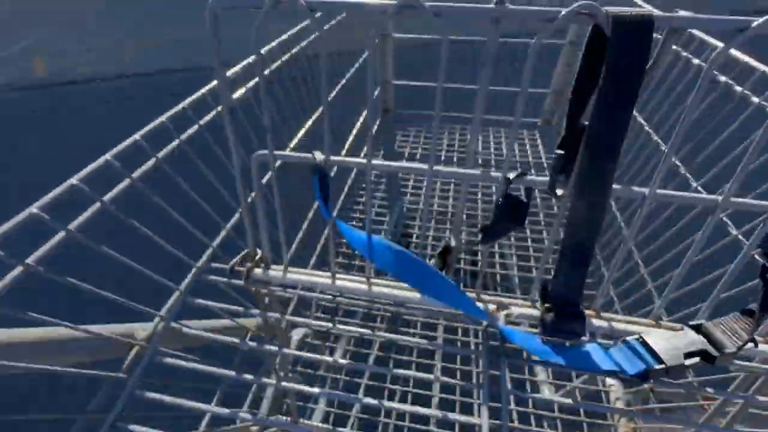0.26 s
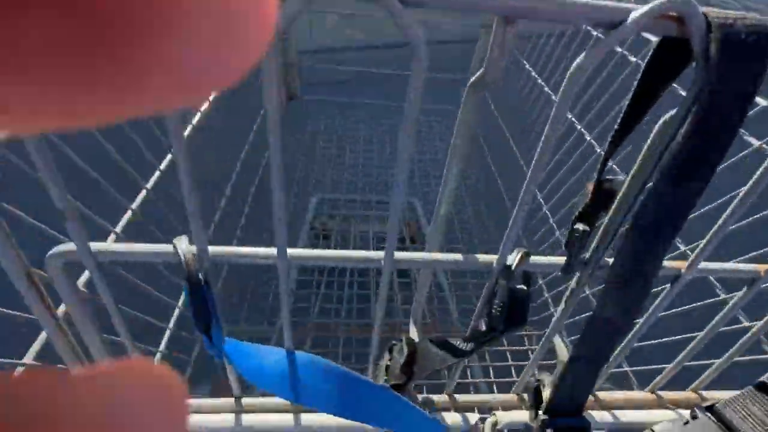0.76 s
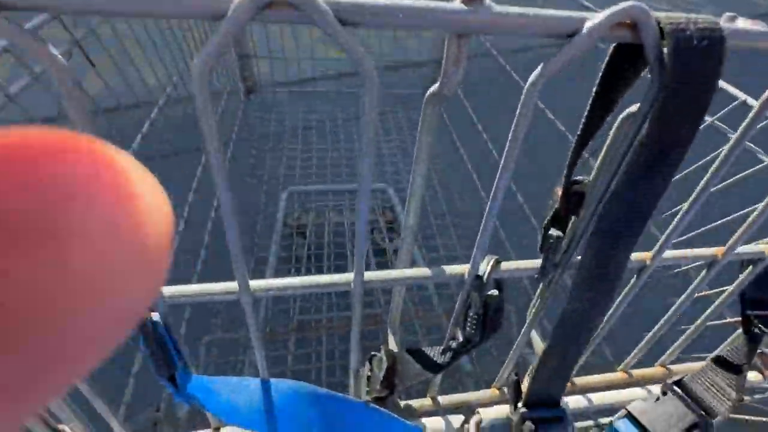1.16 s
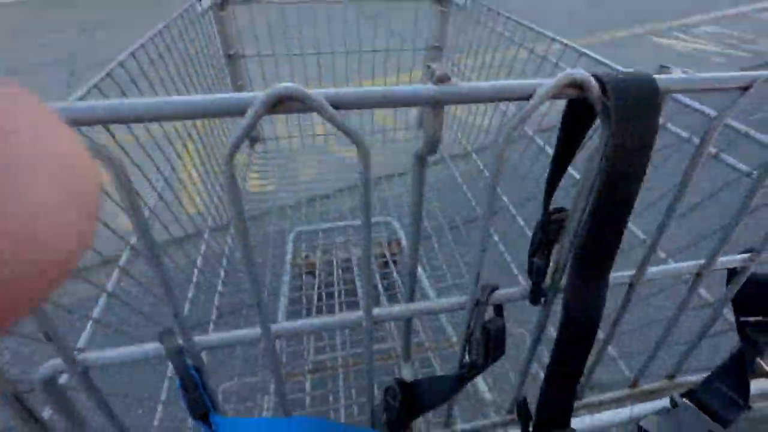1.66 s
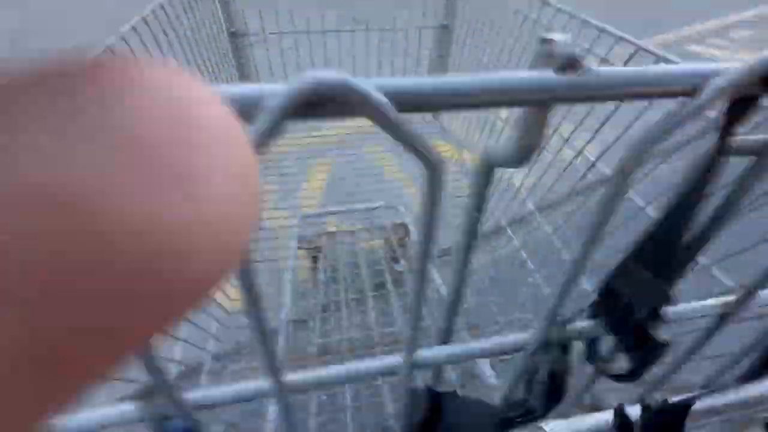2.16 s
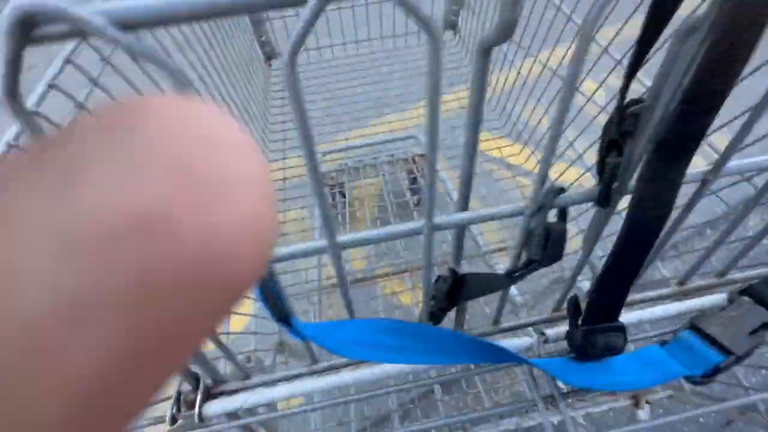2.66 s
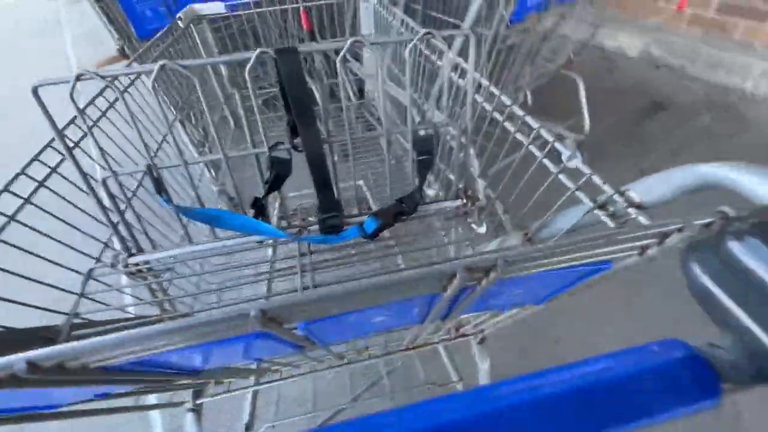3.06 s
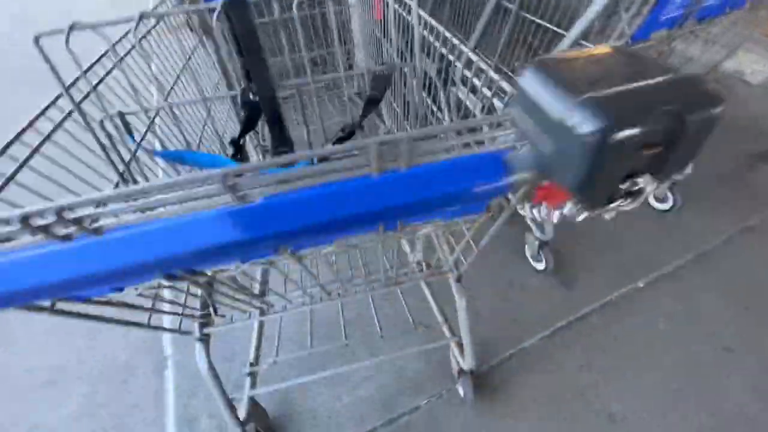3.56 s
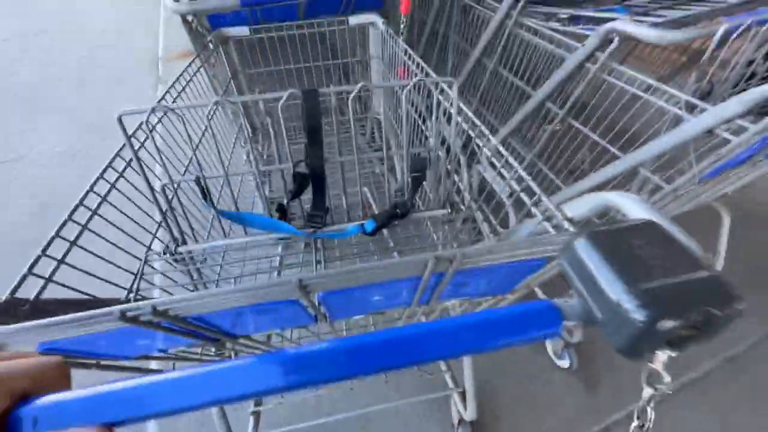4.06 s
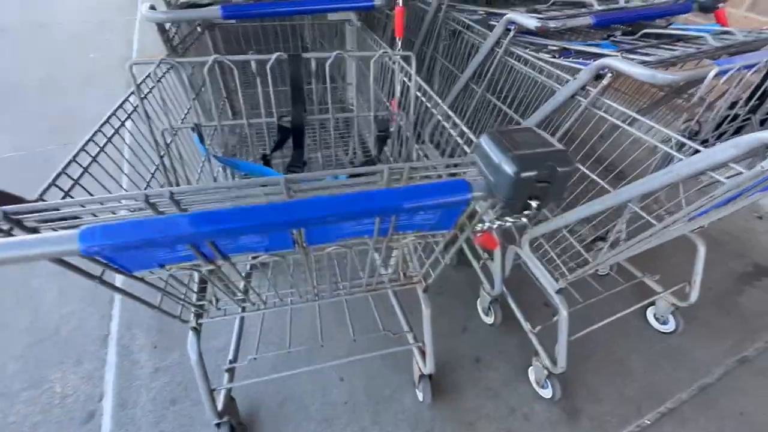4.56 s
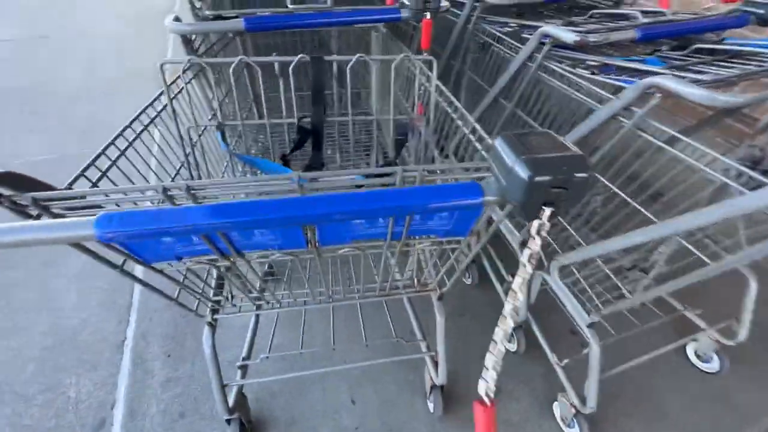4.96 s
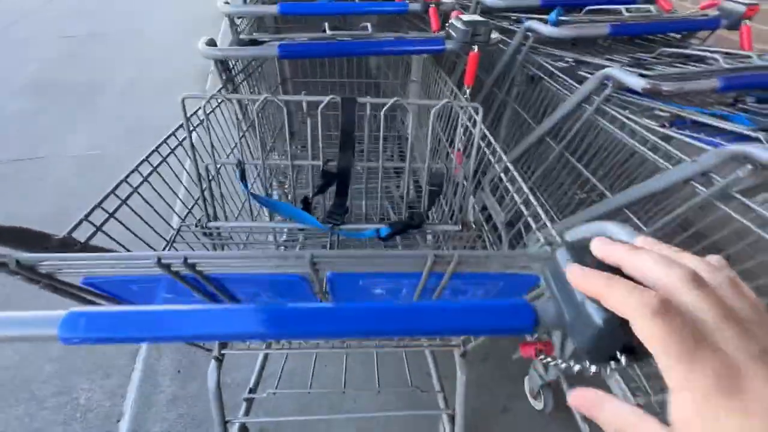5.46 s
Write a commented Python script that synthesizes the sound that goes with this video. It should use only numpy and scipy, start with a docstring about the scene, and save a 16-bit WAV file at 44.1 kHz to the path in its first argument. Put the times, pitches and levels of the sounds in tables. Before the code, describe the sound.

Loud jangling of a wire cart on rough pavement, a sudden near-hush, ringing metal crashes against other carts, then small chain clinks.

```python
"""Over the low noise and hollow drone of a car park, a steel wire shopping cart rattles across rough asphalt.
Wheels rumble, frame tubes clatter and basket wires buzz: noise and random contacts coloured by resonances.
From 2.75 s it glides quietly on smooth concrete, wires shivering and chain links ticking.
From 3.47 s it is shoved into a row of nested carts, and frames scrape and clash in ringing steel modes.
Near 5.2 s a link of the lock chain squeaks as a gliding sine, then the lock clinks in dense partials."""
import sys
import numpy as np
from scipy import signal
from scipy.fft import rfft, irfft, next_fast_len
from scipy.io import wavfile
from scipy.ndimage import uniform_filter1d

SR = 44100
rng = np.random.default_rng(int(sys.argv[2]) if len(sys.argv) > 2 else 0)


def waveform_to_disk(signal):
    """Save audio, clipped to [-1, 1], as 16-bit WAV at the path in sys.argv[1]."""
    frames = np.transpose(np.atleast_2d(signal))
    scaled = np.clip(frames, -1, 1) * 32767
    samples = np.round(scaled).astype(np.int16)
    wavfile.write(sys.argv[1], SR, samples)


N = 251370
TIME = np.arange(N) / SR
SIZE = next_fast_len(N + 8192)  # zero-padded transform length
FREQ = np.fft.rfftfreq(SIZE, 1 / SR)

CONCRETE_S = 2.754  # the wheels reach smooth concrete

# resonances of the wire basket: (frequency [Hz], width [Hz], lift [dB])
BASKET = [(970, 200, 1), (1870, 91, 0.5), (2745, 170, 1.5), (4480, 260, 2), (6110, 480, 2),
          (7186, 180, 6.5), (8960, 350, 1.5)]
# resonances of the nested row: (frequency [Hz], width [Hz], lift [dB])
ROW = [(1130, 280, -0.5), (1900, 200, -1.5), (2230, 120, 2), (2740, 120, -0.5), (4460, 300, 1.5),
       (5750, 120, 3.5), (9750, 250, 0)]
# shoves along the row: (start [s], length [s], frame clatter level [dB], wire buzz level [dB])
SHOVES = [(3.467, 0.21, -27.5, -20.5), (3.56, 0.16, -27, -43.5), (3.717, 0.15, -24, -20),
          (4.11, .02, -43, -30.5), (4.134, 0.085, -31, -29.5), (4.211, 0.058, -23.5, -19.5),
          (4.385, 0.2, -31.5, -28.5), (4.732, 0.12, -43.5, -48), (5, 0.037, -55, -57),
          (5.106, 0.075, -47.5, -54)]


def amp(db):
    """Decibels to gain."""
    return 10 ** (np.asarray(db) / 20)


def unit(pair):
    """Scales a stereo pair so that its centre has rms 1."""
    return pair / np.sqrt(np.mean(pair.mean(0) ** 2) + 1e-20)


def read(points):
    """Reads a table over frequency, joined on a log axis."""
    hz, value = np.transpose(points)
    return np.interp(np.log(FREQ + 1), np.log(hz + 1), value)


def add(mix, s, sound):
    """Mixes a sound in at a time in seconds."""
    part = mix[:, max(round(s * SR), 0):][:, :sound.shape[1]]
    part += sound[:, :part.shape[1]]


def above(hz, order=6):
    """Gain of a high-pass over frequency."""
    return 1 / np.sqrt(1 + (hz / (FREQ + 1)) ** (2 * order))


def heard(pair, gain):
    """Colours two unrelated signals and blends the first into the second for the stereo width of each band."""
    # stereo width up to the treble: (frequency [Hz], left-right correlation [-1 to 1])
    likeness = [(60, 0.5), (160, 0.83), (520, 0.35), (1000, 0.17), (2000, 0), (5000, 0.1), (9800, -0.07)]
    # a band in opposite phase, then a centred top: (frequency [Hz], left-right correlation [-1 to 1])
    top_likeness = [(10100, -.1), (10450, -.8), (10700, -.9995), (12250, -.9995), (12500, .1), (13200, .75),
                    (13900, .98), (16000, .95)]
    left, other = rfft(pair, SIZE) * gain
    same = np.clip(read(likeness + top_likeness), -1, 1)
    right = same * left + np.sqrt(1 - same ** 2) * other
    return irfft(np.array([left, right]), SIZE)[:, :N]


def steel(colour, resonances):
    """Gain of a broad colour lifted at the resonances of the wires."""
    lift_db = sum(db / (1 + (2 * (FREQ - hz) / width) ** 2) for hz, width, db in resonances)
    return amp(read(colour) + lift_db)


def wander(per_s):
    """Slow random drift of spread 1, joining two random points per cycle."""
    knots = rng.standard_normal(size=16384)
    drift = np.interp(TIME * 2 * per_s, np.arange(len(knots)), knots)
    return drift / drift.std()


def swell(start, rise_s):
    """Rises to 1 in rise_s and dies away again."""
    u = np.maximum(TIME - start, 0) / rise_s
    return u * np.exp(1 - u)


def car_park():
    """Steady far traffic as coloured noise, and a hollow drone of resonant noise that swells and fades."""
    # colour of the traffic: (frequency [Hz], level [dB])
    traffic_colour = [(30, -2.5), (70, -8), (150, -2.5), (280, -10.5), (450, -8), (900, -16), (1600, -15.5),
                      (3000, -39), (6000, -35.5), (10000, -59), (15000, -70)]
    # loudness of the drone: (time [s], level [dB])
    drone_levels = [(2.8, -48.5), (3.3, -47), (4.6, -39), (4.95, -39), (5.15, -34), (5.3, -39.5),
                    (5.5, -45), (5.7, -46.5)]
    # resonances of the drone: (frequency [Hz], width [Hz], level [dB])
    drone_modes = [(72.7, 53, 1.5), (196, 25, 1), (347.6, 40, 0), (401.5, 36, -1), (660, 52, -4.5),
                   (840, 350, -8.5)]
    traffic = unit(heard(rng.standard_normal((2, N)), amp(read(traffic_colour))))
    hollow = sum(amp(db) / (1 + (2 * (FREQ - hz) / width) ** 2) for hz, width, db in drone_modes)
    drone = unit(heard(rng.standard_normal((2, N)), hollow))
    drone_gain = amp(np.interp(TIME, *np.transpose(drone_levels)))
    return amp(-43.5) * traffic + drone_gain * drone


def wire(crack_t60, ring_t60, ring_db, wash_t60, wash_db, note_hz, note_db, count=56):
    """One contact: a crack, the ringing of the struck wire and a wash through the mesh, lifted round one note."""
    t = np.arange(SR // 5) / SR
    decay = amp(-60 * t / np.array([crack_t60, wash_t60])[:, None, None])
    crack, wash = rng.standard_normal((2, 2, len(t))) * decay
    hz = rng.uniform(600, 15500, (count, 1))
    signs = rng.choice([-1., 1.], (2, count))
    ring = (signs @ np.sin(2 * np.pi * hz * t)) * amp(-60 * t / ring_t60)
    layers = (crack, 0), (ring, ring_db), (wash, wash_db)  # levels in dB against the crack
    contact = sum(amp(db) * layer / np.linalg.norm(layer) for layer, db in layers)
    note = signal.lfilter(*signal.iirpeak(note_hz, 2 + note_hz / 1000, fs=SR), contact)
    return contact + amp(note_db) * note


def rattle(wires, per_s, size_db, clump_db, clump_hz, turn_db, turn_s):
    """Loose wires hit each other at random; now one, now another takes the lead, at an evened-out level."""
    clumps = amp(clump_db * wander(clump_hz))
    spread = amp(size_db * np.minimum(rng.exponential(1, N), 2.3))
    size = clumps * spread * rng.choice([-1, 1], N)
    hits = size * (rng.random(N) < per_s / SR)
    which = rng.integers(0, len(wires), N)
    buzz = np.zeros((2, N))
    for k, contact in enumerate(wires):
        looseness = rng.uniform(-1.18, 1, size=400)
        lead = np.interp(TIME, np.arange(len(looseness)) * turn_s, amp(turn_db * looseness))
        buzz += signal.oaconvolve((hits * lead * (which == k))[None], contact, axes=1)[:, :N]
    power = abs(uniform_filter1d((buzz ** 2).mean(0), size=2600))  # over about 59 ms
    return buzz / np.sqrt(power + 1e-9)


def shaking(gains, colour, resonances, contacts):
    """Wheels carry the bass as noise; contacts of tubes and thin wires carry the middle and the treble."""
    over_wheels, over_frame = above(318), above(3190)  # crossovers [Hz]
    tone = steel(colour, resonances)
    wheels = heard(rng.standard_normal((2, N)), tone * np.sqrt(1 - over_wheels ** 2))
    frame = heard(contacts, tone * over_wheels * (1 - over_frame ** 2))
    mesh = heard(contacts, tone * over_frame ** 2)
    for hz, width, _ in resonances[2:]:  # each of these resonances flares and fades by itself
        flare = amp(2.0 * np.clip(wander(14), -2, 2)) - 1
        mesh = mesh + flare * signal.lfilter(*signal.iirpeak(hz, hz / (2 * width), fs=SR), mesh)
    return sum(unit(part) * gain for part, gain in zip((wheels, frame, mesh), gains))


def clang(t, modes, scatter_db, detune):
    """Steel rings in decaying sine modes; each call weights and detunes them anew."""
    hz, db, t60 = np.transpose(modes)[:, :, None]
    weight = amp(db + scatter_db * rng.standard_normal((2, len(modes), 1)))
    hz = hz * (1 + detune * rng.standard_normal(hz.shape))
    signs = rng.choice([-1., 1.], weight.shape)
    ring = (weight * signs * np.sin(2 * np.pi * hz * t) * amp(-60 * t / t60)).sum(1)
    return ring / np.linalg.norm(weight, axis=1)


def grit(modes, resonances, per_s, size_db, t60, damped_t60, ring_db, count=12):
    """Scattered contacts, stones under wheels or tube on tube: a dry noise tick and a short ring of steel."""
    t, out = np.arange(SR // 8) / SR, np.zeros((2, N))
    size = amp(size_db * np.minimum(rng.exponential(1, N), 2))
    hits = size * (rng.random(N) < per_s / SR)
    which = rng.integers(0, count, N)
    for k in range(count):
        ring = clang(t, modes, scatter_db=8, detune=.015)
        tick = rng.standard_normal((2, len(t))) * amp(-60 * t / t60)
        tick = tick + amp(ring_db - 60 * t / damped_t60) * ring
        out += signal.oaconvolve((hits * (which == k))[None], tick, axes=1)[:, :N]
    colour = [(200, -14.5), (600, 0.5), (2700, -4.0), (7000, -3), (15000, -5)]  # (Hz, dB)
    return unit(heard(out, steel(colour, resonances)))


def on_asphalt(contacts, stones, stones_db, rumble_db, frame_db, wire_db,
               rumble_follow, frame_follow, wire_follow, uneven_db, uneven_hz):
    """One shaking drives wheels, frame and wires, each by its own amount, until the asphalt ends."""
    # colour of the rolling cart: (frequency [Hz], level [dB])
    roll_colour = [(25, -9), (55, 8), (110, 5), (180, 6.5), (290, -3.5), (500, 3), (820, 1), (1400, -3),
                   (2300, -0.2), (3600, -2), (5500, 1), (8000, -2.5), (9600, -4), (11000, -3),
                   (15500, -1.5)]
    # how hard the rough asphalt shakes the cart: (time [s], level [dB])
    shake_levels = [(0, -25), (.3, -25), (.62, -22.5), (.71, -23), (.81, -26), (.97, -27.5), (1.05, -24),
                    (1.16, -26), (1.24, -24.5), (1.3, -22), (1.42, -23), (1.86, -24.5), (2.0, -22.5),
                    (2.08, -23), (2.26, -19), (2.36, -21), (2.42, -25.5), (2.56, -28), (2.62, -24),
                    (2.68, -21), (2.74, -24.5)]
    # a wheel drops into a dip and the cart shakes harder for a moment: (time [s], lift [dB])
    jolts = [(0.036, 5), (0.562, 3), (.76, 3), (1.01, 2.5), (1.183, 4), (1.258, 1.5), (1.775, 4.5),
             (1.9, 3.5), (2.445, 3), (2.585, 0)]
    usual_shake_db, jolt_rise_s = -25, 0.023
    loose_s, tight_db = 0.5, -6.5  # the frame starts out quiet and works loose
    settle_s, lean_db = 0.0067, -0.12  # fade at the concrete; slight lean to the right

    shake = np.interp(TIME, *np.transpose(shake_levels)) - usual_shake_db
    shake = shake + uneven_db * wander(uneven_hz)
    shake = shake + sum(db * swell(s, jolt_rise_s) for s, db in jolts)
    tight = tight_db * np.maximum(1 - (TIME / loose_s) ** 2, 0)
    rumble = rumble_db + rumble_follow * shake
    frame = frame_db + frame_follow * shake + tight
    wires = wire_db + wire_follow * shake
    cart = shaking(amp([rumble, frame, wires]), roll_colour, BASKET, contacts)
    cart = cart + amp(stones_db + frame_follow * shake + tight) * stones
    rough_ground = np.clip((CONCRETE_S - TIME) / settle_s + .5, 0, 1)
    return cart * rough_ground * amp([[lean_db], [-lean_db]])


def bumps(t60):
    """The heavy frame thuds over a ridge, then against the row: decaying noise in a low band."""
    # thuds: (time [s], level [dB], bottom of band [Hz], top of band [Hz])
    thuds = [(0.022, -27.5, 55.4, 118), (2.14, -23.5, 120, 236), (2.185, -15.5, 139, 237),
             (2.228, -21, 120, 258), (3.475, -12.5, 60, 264), (3.494, -18.5, 50, 151),
             (3.515, -17.5, 38, 80), (3.772, -17, 70, 360), (3.795, -23.5, 45, 110)]
    out, t = np.zeros((2, N)), np.arange(SR // 2) / SR
    for s, db, bottom_hz, top_hz in thuds:
        push = rng.standard_normal((2, len(t))) * amp(-60 * t / t60)
        thud = signal.lfilter(*signal.butter(2, [bottom_hz, top_hz], "band", fs=SR), push)
        add(out, s, amp(db) * thud / abs(thud).max(1, keepdims=True))
    return heard(out, 0.88)


def knocks(blows, modes, resonances, rise_s, tail_db, tail_t60, note_db, ring_db, detune, lean_db, gain_db):
    """A knock is a short noise chatter round one main note; a noise tail and steel modes ring on after it."""
    out, t = np.zeros((2, N)), np.arange(SR // 3) / SR
    for s, db, bright_db, hz, t60 in blows:
        decay = amp(-60 * t / t60) + amp(tail_db - 60 * t / tail_t60)
        shape = (1 - np.exp(-t / rise_s)) * decay
        blow = rng.choice([-1., 1.], (2, len(t))) * shape / shape.max()
        dull = signal.lfilter(*signal.butter(1, 3000, fs=SR), blow)
        bright = amp(bright_db) * (blow - dull)
        note = amp(note_db) * signal.lfilter(*signal.iirpeak(hz, 4 + hz / 600, fs=SR), blow)
        ring = amp(ring_db) * clang(t, modes, scatter_db=7.5, detune=detune)
        add(out, s, amp(db + gain_db) * (dull + bright + note + ring))
    colour = [(100, 4.5), (600, -2.0), (1200, 1.0), (2500, 0.5), (5500, 0.0), (9000, -5.5), (15000, 3)]  # (Hz, dB)
    return heard(out, steel(colour, resonances)) * amp([[lean_db], [-lean_db]])


def on_concrete(contacts, stones, stones_db, rumble_db, frame_db, wire_db, fade_db_per_s, shiver_frame_db):
    """The glide fades steadily until the cart meets the row; grit ticks, and wires and frame shiver briefly."""
    # colour of the shaking on smooth concrete: (frequency [Hz], level [dB])
    glide_colour = [(55, 2), (190, 13), (380, 13), (600, 5), (1000, 4), (1900, 6), (3000, -3.5), (5500, -1),
                    (7200, -2.5), (8400, 2), (11000, 2.5), (15500, -8)]
    # brief shivers of loose wires: (time [s], level [dB])
    shiver_levels = [(2.752, -52), (2.82, -54.5), (2.97, -42.5), (3.02, -45), (3.15, -48.5), (3.2, -46),
                     (3.38, -48.5), (5.019, -65)]
    gliding = (TIME > CONCRETE_S) * (TIME < SHOVES[0][0])
    glide = gliding * amp(-fade_db_per_s * (TIME - CONCRETE_S))
    shiver_power = sum((amp(db) * swell(s, 0.015)) ** 2 for s, db in shiver_levels)
    wires = np.sqrt((amp(wire_db) * glide) ** 2 + shiver_power)
    frame = amp(frame_db) * glide + amp(shiver_frame_db) * np.sqrt(shiver_power)
    cart = shaking([amp(rumble_db) * glide, frame, wires], glide_colour, BASKET, contacts)
    return cart + amp(stones_db) * glide * stones


def chain(tick_gain_db, tick_t60, tick_note_db, squeak_rough):
    """Links tick as noise bursts, one squeaks as a rough sine, and lock and links ring in clusters of partials."""
    # ticking links: (time [s], level [dB], ring [Hz])
    link_ticks = [(2.902, -30, 1870), (2.978, -48.5, 3000), (3.098, -35, 1870), (3.154, -46, 5600),
                  (3.188, -45, 5600), (3.212, -51, 4276), (3.341, -34, 3000), (4.715, -35, 2400),
                  (4.815, -25.5, 3400), (4.973, -36, 2270), (5.015, -35, 7000), (5.165, -26.5, 1500),
                  (5.211, -24.5, 2300), (5.218, -34, 3400), (5.232, -29.5, 3400)]
    # a link squeaks as it turns: (time [s], frequency [Hz], level [dB])
    squeak_glide = [(5.174, 7900, -49), (5.183, 8800, -40), (5.196, 10650, -36), (5.206, 11200, -58)]
    # the chain strikes the lock: (time [s], level [dB])
    clink = (5.248, -43)
    # clusters ringing in lock and links: (frequency [Hz], width [Hz], level [dB], t60 [s])
    lock_clusters = [(1760, 3200, 3, 1), (3400, 360, -0.5, 0.5), (3750, 120, -9, 0.5), (4160, 290, -8, 0.6),
                     (5000, 8400, -1.5, 0.72), (5760, 550, 0, 0.56), (7460, 550, -0.5, 0.36),
                     (8640, 490, -2.5, 0.3), (9600, 520, -1.5, 0.34), (14000, 2000, -6, 0.18),
                     (15400, 840, -5, .3)]
    link_spacing_hz = 10  # mean gap between the partials of a cluster

    out, t = np.zeros((2, N)), np.arange(SR // 2) / SR
    for s, db, hz in link_ticks:
        decay = amp(-60 * t / tick_t60) + amp(-22 - 60 * t / .2)  # tick and a faint tail
        tick = rng.standard_normal((2, len(t))) * decay
        tick = tick + amp(tick_note_db) * signal.lfilter(*signal.iirpeak(hz, 2, fs=SR), tick)
        tick = signal.lfilter(*signal.butter(2, 7500, fs=SR), tick)
        add(out, s, amp(db + tick_gain_db) * tick / abs(tick).max())

    bins = np.fft.rfftfreq(len(t), 1 / SR)
    for hz, width, db, t60 in lock_clusters:
        partials = rng.random(len(bins)) < bins[1] / link_spacing_hz
        band = np.exp(-2 * ((bins - hz) / width) ** 2)
        cluster = irfft(rfft(rng.standard_normal((2, len(t)))) * partials * band, len(t))
        add(out, clink[0], amp(clink[1] + db - 60 * t / t60) * unit(cluster))

    s, hz, db = np.transpose(squeak_glide)
    rough_hz = np.interp(TIME, s, hz) * (1 + squeak_rough * wander(900))
    phase = 2 * np.pi * np.cumsum(rough_hz) / SR
    squeaking = (TIME > s[0]) * (TIME < s[-1])
    out += amp(np.interp(TIME, s, db)) * squeaking * np.sin(phase)
    return heard(out * amp([[2], [-3]]), above(1260, order=2))


def scrape(start, length, fade_db_per_s):
    """Level of a shove: it bites quickly, holds while the cart moves and then rings out."""
    bite = np.clip((TIME - start) / 0.036, 0, 1)
    return bite * amp(-fade_db_per_s * np.maximum(TIME - start - length, 0))


def into_row(contacts, clashes, clash_db, clash_follow, rumble_db, rumble_follow, frame_gain_db, wire_gain_db):
    """Each shove sets frames and wires of the row going; rumble and small clashes follow and outlast the frames."""
    # colour of the nested row: (frequency [Hz], level [dB])
    nest_colour = [(25, 0.5), (55, 5), (190, 11.5), (290, 4.5), (550, 5), (850, 2.5), (1200, 8),
                   (2300, 5.5), (3800, -1), (6000, -2.5), (7800, -1.5), (9400, 2), (11500, -4),
                   (15500, -4.5)]
    frame_fade, wire_fade = 67, 71  # [dB per s]
    frame = np.sqrt(sum((amp(db) * scrape(s, length, frame_fade)) ** 2 for s, length, db, _ in SHOVES))
    wires = np.sqrt(sum((amp(db) * scrape(s, length, wire_fade)) ** 2 for s, length, _, db in SHOVES))
    push = frame / frame.max()
    rumble = amp(rumble_db) * push ** rumble_follow
    gains = [rumble, amp(frame_gain_db) * frame, amp(wire_gain_db) * wires]
    row = shaking(gains, nest_colour, ROW, contacts)
    return row + amp(clash_db) * push ** clash_follow * clashes


def scene():
    """One cart rolls, glides and meets the row, whose struck wires ring longer."""
    # notes of the thinnest wires: (frequency [Hz])
    thin_wires_hz = [8490, 10050, 14000]
    # modes of the gate: (frequency [Hz], level [dB], t60 [s])
    gate_modes = [(496, -5.5, 0.1), (990, -4, 0.1), (1164, -4, 0.092), (1390, -1, 0.084), (1908, 1.5, 0.16),
                  (2260, -4.5, 0.27), (2610, 5.5, 0.14), (3520, -2, 0.17), (4810, -2, 0.23),
                  (5740, -3.5, 0.22)]
    # modes of the row's frame tubes: (frequency [Hz], level [dB], t60 [s])
    tube_modes = [(342.6, -3.5, 0.28), (721, -7.5, 0.4), (1127, 2, 0.27), (1198, -6, 0.09),
                  (1800, -0.5, 0.26), (1970, 2, .18), (2214, -2, 0.32), (2500, 2, .16), (2850, 3, 0.15),
                  (4300, -7.5, 0.18)]
    # seat flap and gate knock on the basket:
    # (time [s], level [dB], treble against middle [dB], main note [Hz], chatter t60 [s])
    gate_knocks = [(.068, -18, 4, 2690, 0.036), (.098, -15.5, -4.5, 990, .07), (.197, -19, 10, 2690, 0.02),
                   (.416, -14, -6, 1870, 0.022), (.448, -6.5, -5.5, 7140, 0.034),
                   (.511, -16, -1, 2690, .022), (0.545, -5, -9, 990, .016), (0.567, -7, -2, 1300, 0.05),
                   (.603, -15, -3, 990, 0.037), (.620, -16, -3, 4700, 0.024), (0.727, -5, -14, 2670, 0.027),
                   (0.762, -5, 1.5, 2600, 0.047), (.793, -9, 1, 990, .025), (.832, -4.5, -4, 2690, 0.017),
                   (.863, -7.5, 1, 1430, 0.035), (.896, -9.5, -16, 2700, 0.035),
                   (.919, -9.5, -8, 990, 0.032), (1.070, -20, -5, 1870, 0.016),
                   (1.161, -10, 1, 4700, 0.024), (1.201, -8, -3.5, 1870, 0.038),
                   (1.307, -7, -2, 4600, 0.038), (1.361, -7, -3, 2690, .022), (1.428, -8, -7, 1840, 0.0091),
                   (1.473, -6.5, -8, 990, .025), (1.503, -9, -7, 1870, 0.029), (1.535, -14, -3, 4680, .014),
                   (1.657, -6.5, -10, 990, 0.03), (1.783, -4.5, -3, 9000, 0.026),
                   (1.826, -18, -5, 1870, .022), (2.044, -7.5, -7, 2690, 0.015),
                   (2.0945, 3.5, -8, 5690, 0.036), (2.101, -4.5, -18, 1400, 0.11),
                   (2.143, -1.5, -3.5, 8600, 0.035), (2.153, 6.5, -8, 1060, 0.018),
                   (2.172, -1, -3, 2500, 0.11), (2.202, 4.5, -16, 2090, 0.021),
                   (2.209, 0.5, -14, 1710, 0.037), (2.231, -6.5, -13, 1020, .04),
                   (2.252, -2.5, -14, 1870, 0.058), (2.271, -6.5, 2, 4670, 0.032),
                   (2.350, -22, 18, 13500, 0.18), (2.670, -10, 8, 4670, .04), (2.699, -8, 0, 2630, 0.018)]
    # frame strikes frame in the row:
    # (time [s], level [dB], treble against middle [dB], main note [Hz], chatter t60 [s])
    frame_clashes = [(3.470, -11, -14, 1900, 0.052), (3.48, 0, -3, 680, 0.037),
                     (3.581, -4.5, -12, 2300, 0.04), (3.604, -7, -11, 1130, 0.034),
                     (3.642, -6, 2, 1140, 0.028), (3.671, -6, -10, 1170, .025),
                     (3.749, -4.5, -11, 2230, 0.061), (3.766, -6, -4, 2420, .035),
                     (3.779, -2, -11, 1900, 0.057), (3.813, -5, -9, 1130, .03), (3.836, -14, -8, 2230, .03),
                     (4.144, -10.5, 9.5, 13400, 0.012), (4.158, -9, -10, 1260, 0.05),
                     (4.228, -8.5, 7, 3140, 0.093), (4.283, -6, -5, 1900, .014), (4.328, -9, 0, 2950, .01),
                     (4.415, -9.5, 4.5, 14000, 0.044), (4.696, -16.5, -11, 4960, 0.027)]

    near = [wire(crack_t60=0.01, ring_t60=0.071, ring_db=-2.5, wash_t60=0.27, wash_db=3,
                 note_hz=hz, note_db=6.5) for hz in [r[0] for r in BASKET] + thin_wires_hz]
    nested = [wire(crack_t60=0.0078, ring_t60=0.29, ring_db=-9.5, wash_t60=0.28, wash_db=9.5,
                   note_hz=hz, note_db=-12.5) for hz in [r[0] for r in ROW] + thin_wires_hz]
    rolling = rattle(near, per_s=600, size_db=3, clump_db=0, clump_hz=45.9, turn_db=5, turn_s=.03)
    sliding = rattle(nested, per_s=1100, size_db=2.0, clump_db=-0.5, clump_hz=49.6, turn_db=3.5, turn_s=0.09)

    stones = grit(gate_modes, BASKET, per_s=150, size_db=-0.5, t60=0.007, damped_t60=0.051, ring_db=-5.5)
    cart = on_asphalt(rolling, stones, stones_db=-36.5, rumble_db=-39.0, frame_db=-34, wire_db=-27.5,
                      rumble_follow=0.95, frame_follow=0.9, wire_follow=1.0, uneven_db=0.62, uneven_hz=14)
    cart += bumps(t60=0.13)
    cart += knocks(gate_knocks, gate_modes, BASKET, rise_s=0.00059, tail_db=-19, tail_t60=0.15,
                   note_db=9.5, ring_db=-8, detune=0.0143, lean_db=-0.5, gain_db=-11.5)
    cart += on_concrete(sliding, stones, stones_db=-51.5, rumble_db=-59, frame_db=-51.5, wire_db=-49.5,
                        fade_db_per_s=5.5, shiver_frame_db=-17)
    cart += chain(tick_gain_db=-4.0, tick_t60=0.05, tick_note_db=12, squeak_rough=0.051)
    jostle = grit(tube_modes, ROW, per_s=60, size_db=3, t60=0.022, damped_t60=0.24, ring_db=0)
    cart += into_row(sliding, jostle, clash_db=-34.0, clash_follow=0.9, rumble_db=-31.5, rumble_follow=0.85,
                     frame_gain_db=-2.2, wire_gain_db=0.44)
    cart += knocks(frame_clashes, tube_modes, ROW, rise_s=0.00064, tail_db=-23, tail_t60=0.16,
                   note_db=11.0, ring_db=-6.5, detune=0.0082, lean_db=0.3, gain_db=-12.5)
    return cart + car_park()


def record(dry):
    """The colour of each microphone port, a low-cut against wind, a soft ceiling, then the band limit."""
    # stereo balance below the right port's peak: (frequency [Hz], left against right [dB])
    balance = [(100, 0.5), (500, 0.5), (1200, 2.7), (2300, -0.5), (3300, 1.5), (5600, 4.5), (7000, 0)]
    peak_hz, peak_width_hz, peak_db = 9140, 2370, 6  # the right port lifts this treble band
    lean_db = read(balance) / 2 * (FREQ < peak_hz)
    lift_db = peak_db * np.maximum(1 - ((FREQ - peak_hz) / peak_width_hz) ** 2, 0) ** 2
    ports = amp([lean_db, lift_db - lean_db]) * above(43, order=4)
    x = irfft(rfft(dry, SIZE) * ports, SIZE)[:, :N]
    x = x / (1 + (x / .85) ** 6) ** (1 / 6)
    band_limit = signal.firwin(801, 15800, window=("kaiser", 8), fs=SR)
    return signal.oaconvolve(x, band_limit[None], "same")


dry = scene()
out = record(dry)
waveform_to_disk(out)
```